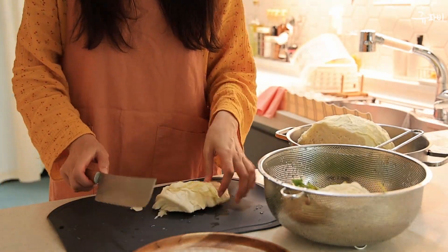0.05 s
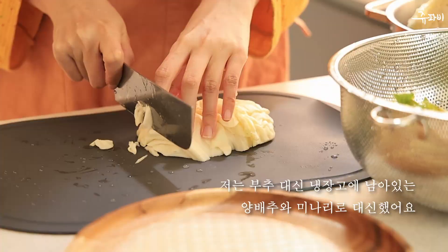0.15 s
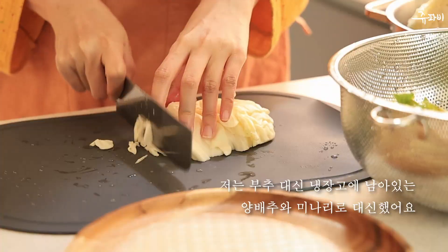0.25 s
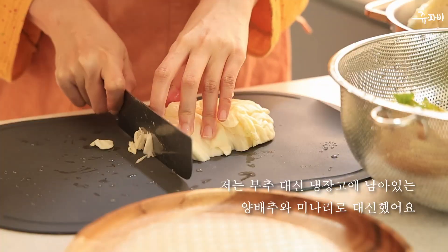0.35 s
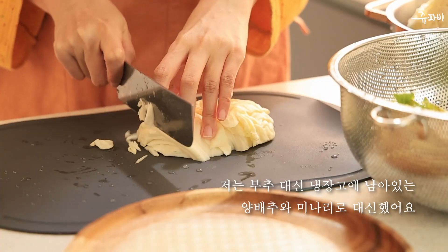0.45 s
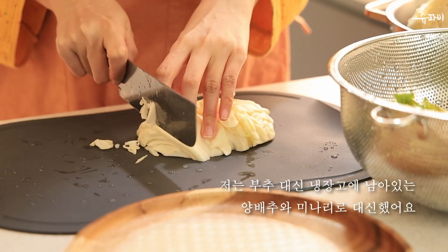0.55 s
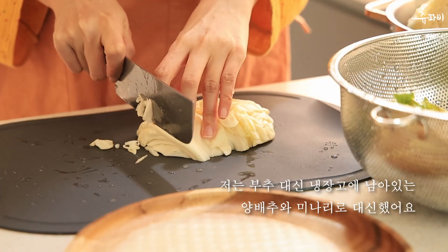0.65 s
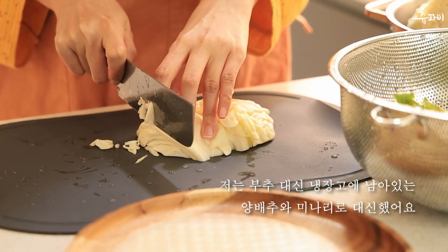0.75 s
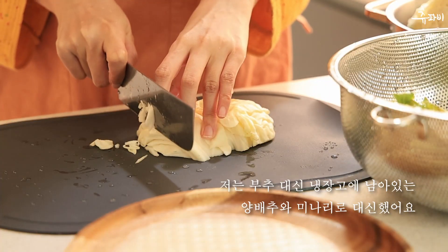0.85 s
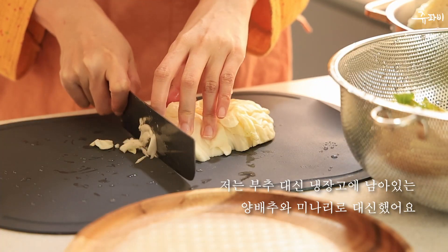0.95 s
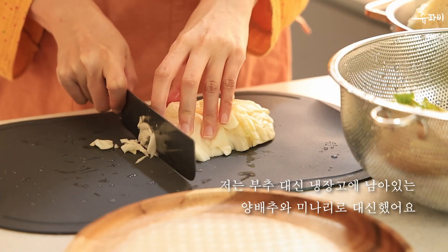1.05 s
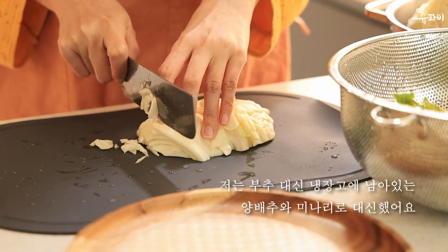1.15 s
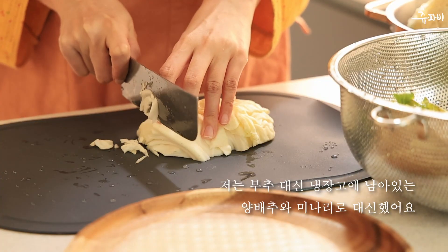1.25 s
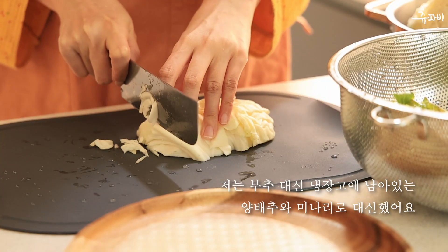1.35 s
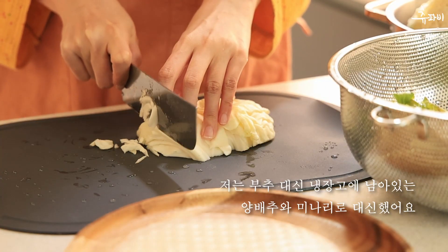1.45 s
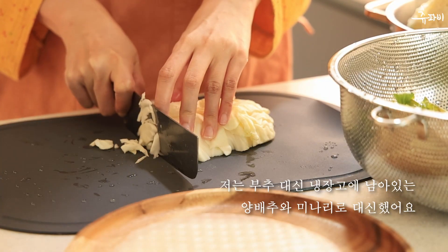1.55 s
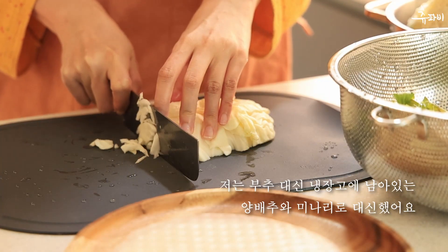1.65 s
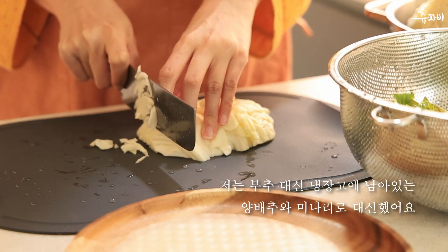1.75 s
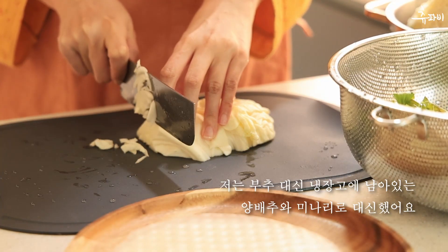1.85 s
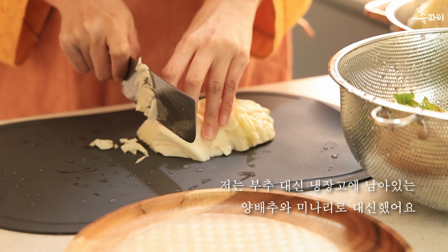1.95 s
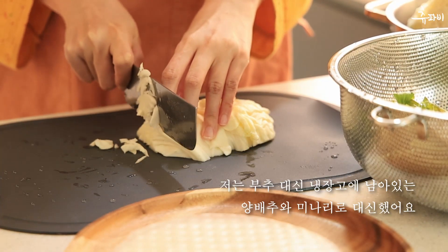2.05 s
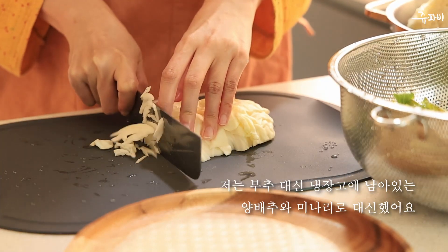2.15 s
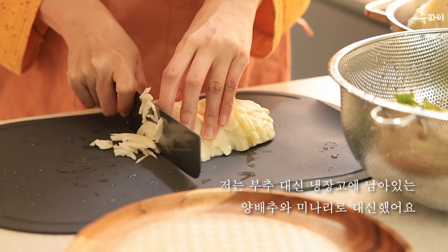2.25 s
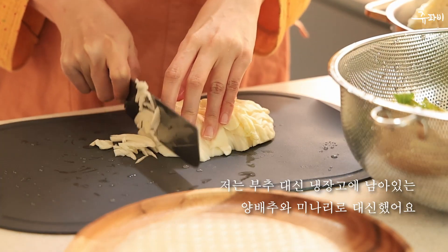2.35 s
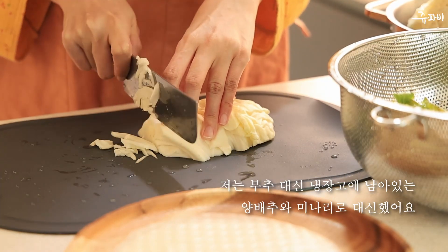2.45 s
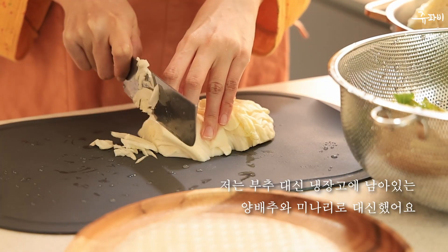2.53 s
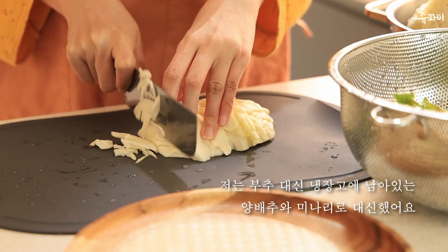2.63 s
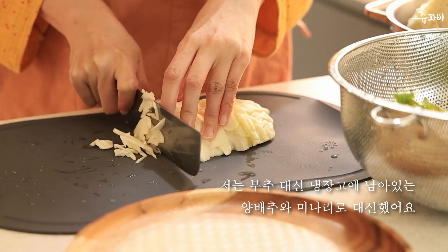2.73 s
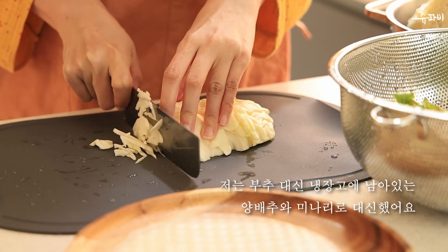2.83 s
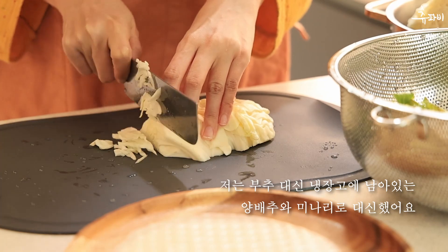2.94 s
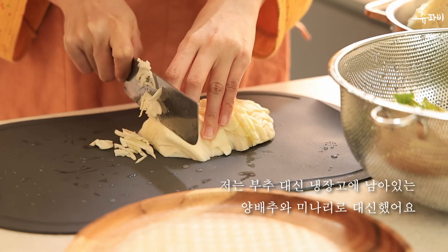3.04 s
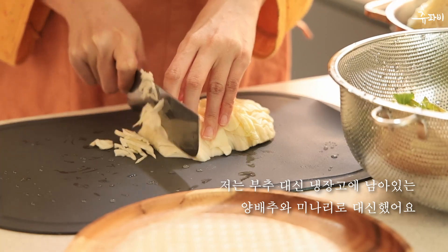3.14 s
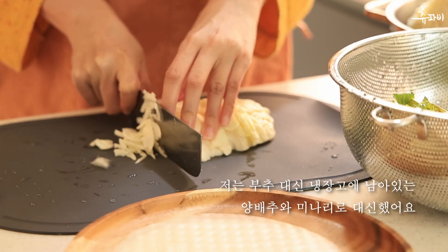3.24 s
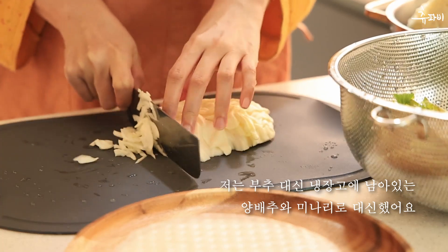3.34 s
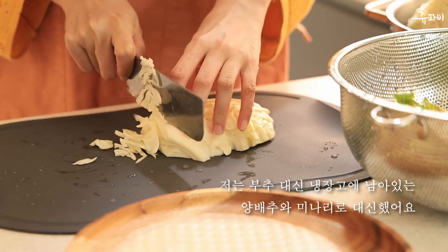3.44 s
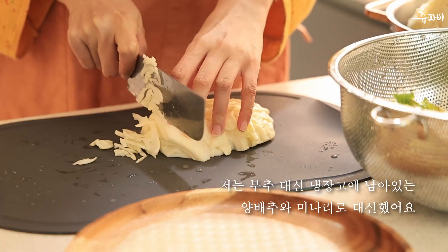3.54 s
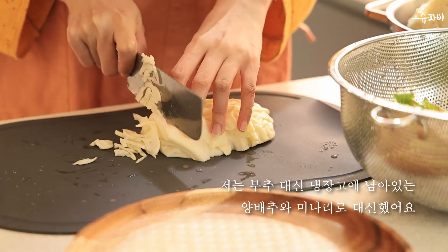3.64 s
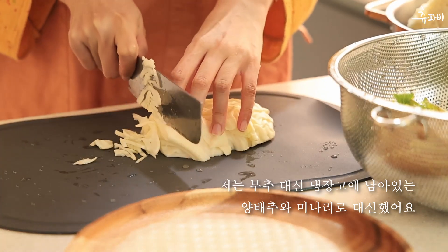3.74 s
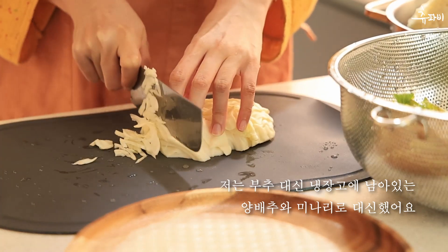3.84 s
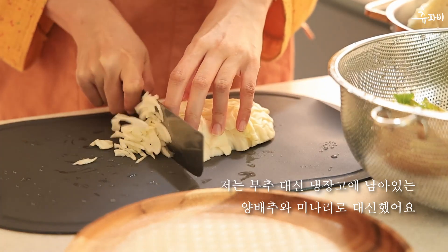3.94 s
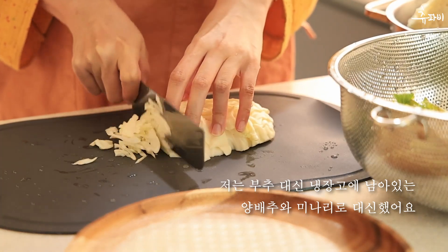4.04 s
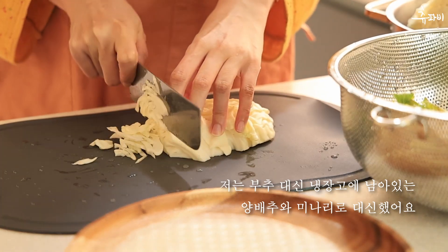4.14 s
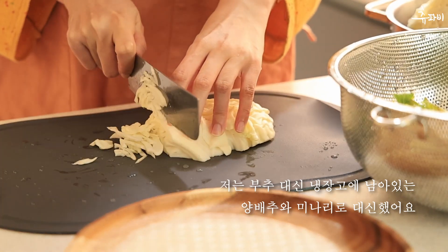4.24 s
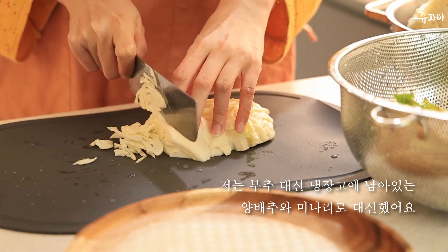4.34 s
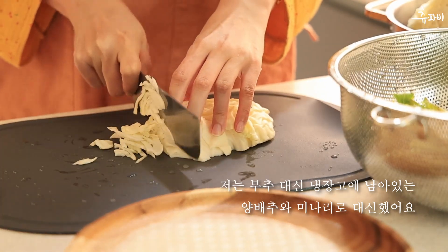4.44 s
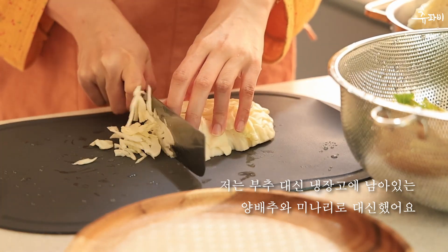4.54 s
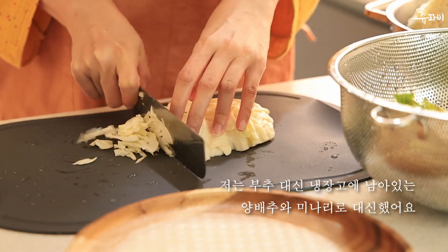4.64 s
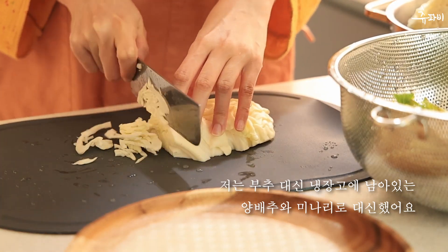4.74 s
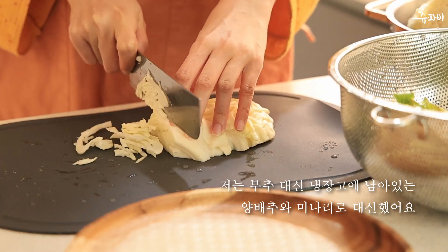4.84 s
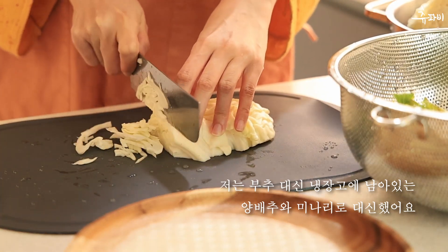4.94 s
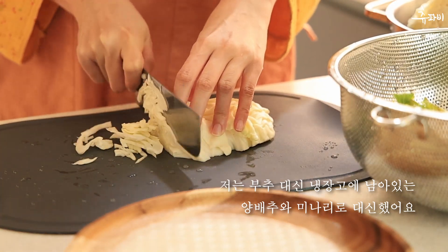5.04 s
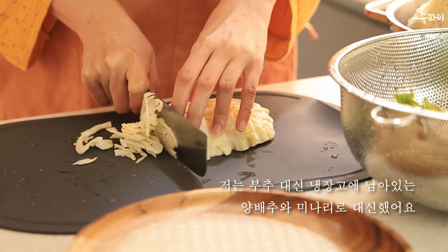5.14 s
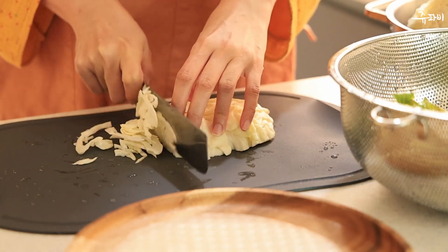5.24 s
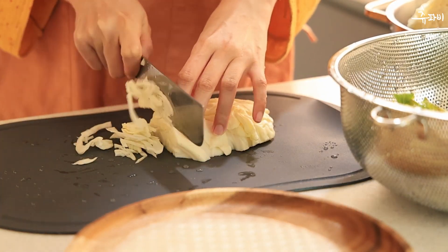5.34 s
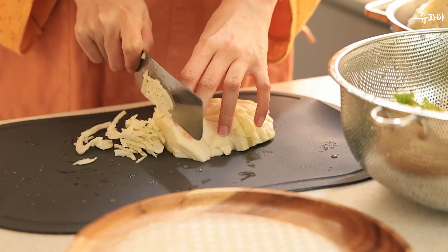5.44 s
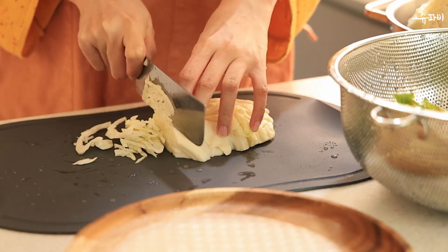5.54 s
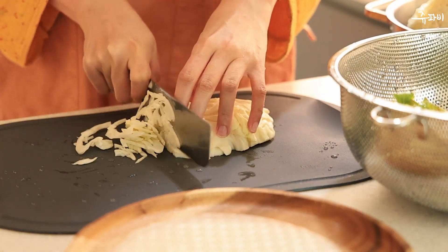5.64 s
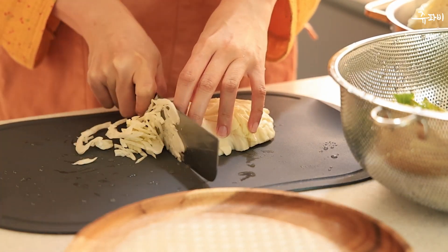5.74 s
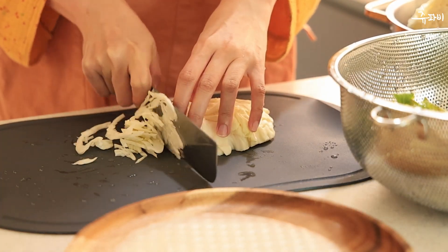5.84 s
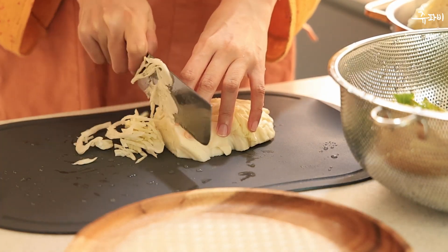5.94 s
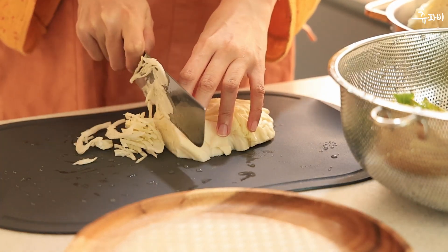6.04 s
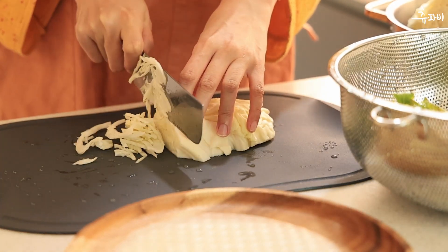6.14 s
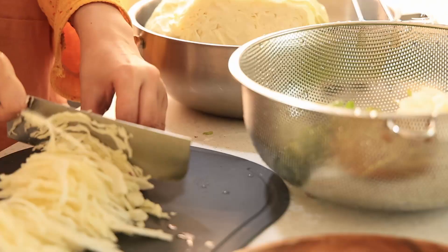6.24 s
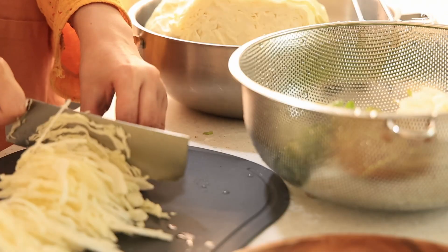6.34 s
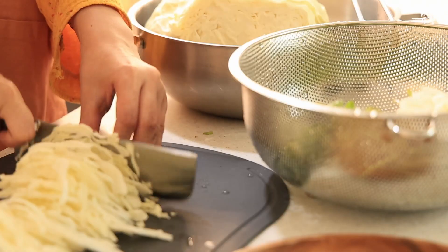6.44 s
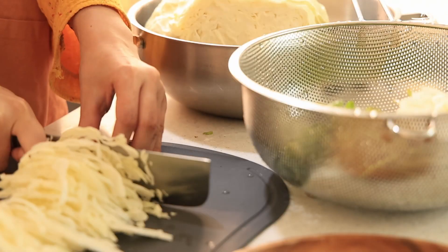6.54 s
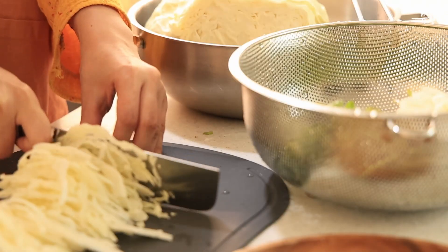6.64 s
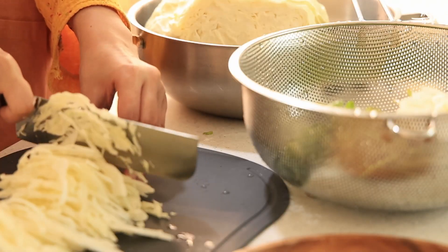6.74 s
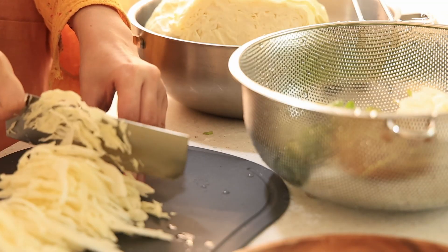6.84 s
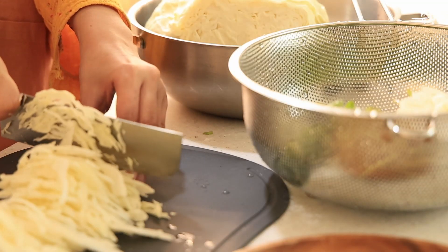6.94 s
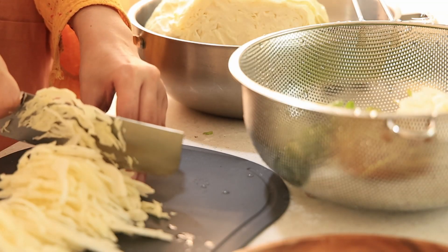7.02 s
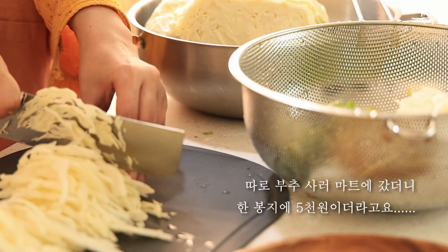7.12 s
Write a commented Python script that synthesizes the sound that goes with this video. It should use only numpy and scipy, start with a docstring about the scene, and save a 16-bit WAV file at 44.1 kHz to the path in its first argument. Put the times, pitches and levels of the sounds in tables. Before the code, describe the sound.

Very close to the microphone, a wide blade slices a cabbage wedge. A bare knock comes first, then ten crunching strokes, each growing louder and juicier before a solid tap on a plastic board. Ribs snap, loose shreds tick and wet leaves rub faintly between strokes. A small kitchen adds short reverberation over quiet air, faint hum and low rumble.

```python
"""Crunching strokes of a broad knife through a wedge of cabbage, each ending in a knock on a plastic board.
Bursting cells give the crunch and fizz, louder and wetter as the blade sinks; struck modes give the knocks.
Ribs snap, shreds tick and leaves rub as filtered noise bursts, over room air, a faint hum and a low rumble.
The knocks ring in a small kitchen and overload the close microphone, where a limiter rounds them off."""
import sys
import numpy as np
from scipy import signal
from scipy.fft import rfft, irfft
from scipy.io import wavfile

SR = 44100
rng = np.random.default_rng(int(sys.argv[2]) if len(sys.argv) > 2 else 0)


def master(y):
    """Save y as 16-bit WAV."""
    cut = np.clip(np.atleast_2d(y).T, -1, 1)
    pcm = np.round(cut * 32767)  # scale
    wavfile.write(sys.argv[1], SR, pcm.astype(np.int16))


N = 316638
TIME = np.arange(N) / SR


def from_db(db):
    """Level law: amplitude gain is ten to the power of decibels over twenty."""
    return 10 ** (np.asarray(db) / 20)


def rms_one(x):
    """Normalisation: equal mean power, so that a later gain alone sets the rms level."""
    return x / np.sqrt(np.mean(x ** 2) + 1e-20)


def at_hz(rows, hz, axis=1):
    """Logarithmic frequency scale: a table column is interpolated by musical interval."""
    rows = np.array(rows)
    return np.interp(np.log(np.maximum(hz, 1)), np.log(rows[:, 0]), rows[:, axis])


def butter(x, hz, kind, order=2):
    """Maximally flat (Butterworth) filtering: the passband has no ripple."""
    return signal.sosfilt(signal.butter(order, hz, kind, fs=SR, output="sos"), x)


def low_pass(x, hz, order=2):
    """Low-pass filtering: slow variations pass and fast ones are smoothed away."""
    return butter(x, hz, "low", order)


def coloured(x, spectrum):
    """Minimum phase: folding the cepstrum gives the causal filter of a given magnitude."""
    size = 2048
    magnitude = from_db(at_hz(spectrum, np.fft.rfftfreq(size, 1 / SR)))
    cepstrum = irfft(np.log(magnitude))
    cepstrum[1:size // 2] *= 2
    cepstrum[size // 2 + 1:] = 0
    impulse_response = irfft(np.exp(rfft(cepstrum)))
    return signal.fftconvolve(x, impulse_response)[:len(x)]


def ring(x, modes, lag=0):
    """Modal superposition: damped resonators in parallel, each `lag` radians behind the one below."""
    out = 0
    for k, (hz, db, t60) in enumerate(modes):
        radius = np.exp(-np.log(1000) / (t60 * SR))
        angle = 2 * np.pi * hz / SR
        start = from_db(db) * np.array([np.sin(-k * lag), radius * np.sin(angle + k * lag)])
        out = out + signal.lfilter(start, [1, -2 * radius * np.cos(angle), radius * radius], x + 1e-18)
    return out


def add(track, s, sound):
    """Linear superposition: a sound is summed into the track from its start time."""
    i = round(s * SR)
    track[i:i + len(sound)] += sound[:N - i]


def grains(per_s, spread_db):
    """Shot noise: independent clicks of uneven size and random sign, as from bursting cells."""
    sizes = from_db(spread_db * np.minimum(rng.exponential(1, N), 4))
    return sizes * rng.choice([-1, 1], N) * (rng.random(N) < per_s / SR)


def flutter(hz, depth_db):
    """Amplitude modulation: a gain of unit rms wavers as slow noise does."""
    return rms_one(from_db(depth_db * rms_one(low_pass(rng.standard_normal(N), hz))))


# blade sinking through the wedge: start_s, sinking_s, easing_s, swell_db (of the crunch while sinking),
# then halfway down, before the common trims: crunch_db, fizz_db, grumble_db
CUTS = [(0.895, 0.11, 0.007, 15.5, -41.5, -48, -46.5), (1.509, 0.07, 0.027, 11.5, -39, -43, -41.5),
        (2.08, 0.097, 0.027, 20.5, -39.5, -47, -37), (2.663, 0.055, 0.016, 22, -38.5, -46.5, -32),
        (3.163, 0.051, 0.04, 16.5, -34, -40.5, -28.5), (3.85, 0.11, 0.0072, 20.5, -34.5, -43.5, -28.5),
        (4.424, 0.1056, 0.0088, 13, -36, -43.5, -28), (5.046, 0.082, 0.035, 8, -34.5, -43, -31.5),
        (5.581, 0.15, .006, 10.5, -37.5, -44.5, -32.5), (6.451, 0.043, 0.072, 7, -31.5, -42, -33)]
# spectrum of breaking leaf: frequency_hz, relative level_db (per Hz)
CRUNCH = [(300, 7), (700, 4.5), (1300, 5), (1700, 6), (2150, 0.5), (2600, 1), (3400, 3), (4200, -1.5),
          (4900, -8), (6100, -4.5), (7200, -10.5), (10000, -19.5)]
# spectrum of escaping juice: frequency_hz, relative level_db (per Hz)
FIZZ = [(3000, -56), (6500, -8.5), (8000, 7), (9100, 8.5), (10500, 3), (13000, -2), (16000, -10)]
# board resonances under the pressing blade: pitch_hz, relative level_db, t60_s
PRESSED = [(112.5, -7, 0.14), (213, -62, 0.048), (339.2, 6, 0.12), (459, 12, 0.065), (482, -3.5, 0.17),
           (723, -2.5, 0.06)]
# juice swells faster than the crunch, the board's grumble more slowly (both as a share of swell_db)
FIZZ_SWELL, GRUMBLE_SWELL = 1.4, 0.55
EASE_DB = 21.5  # fall in level as the last leaves give way, past the thick of the wedge


def cuts(fade_in_s=0.0012, crunch_db=2.0, fizz_db=-1.5, grumble_db=-0.5):
    """Fracture noise: cell bursts strengthen with depth, juice fizzes and jerky force excites the board."""
    gains = np.zeros((3, N))
    for s, sink_s, ease_s, swell_db, *levels in CUTS:
        on = (TIME > s - fade_in_s) & (TIME < s + sink_s + ease_s)
        t = TIME[on] - s
        ease_db = -EASE_DB * (np.maximum(t - sink_s, 0) / ease_s) ** 2
        gate = np.interp(t, [-fade_in_s, 0], [0, 1]) * from_db(ease_db)
        sinking_db = swell_db * (np.minimum(t / sink_s, 1) - 0.5)
        for row, (db, share) in enumerate(zip(levels, (1, FIZZ_SWELL, GRUMBLE_SWELL))):
            gains[row, on] += gate * from_db(db + share * sinking_db)
    crunch_gain, fizz_gain, grumble_gain = gains

    leaves = flutter(hz=144, depth_db=1.4)
    cracks = rms_one(coloured(leaves * grains(per_s=5000, spread_db=1.5), CRUNCH))
    juice = rms_one(coloured(leaves * grains(per_s=9000, spread_db=2.5), FIZZ))
    board = rms_one(ring(grains(per_s=2500, spread_db=0.0), PRESSED))
    crunch = from_db(crunch_db) * crunch_gain * cracks
    fizz = from_db(fizz_db) * fizz_gain * juice
    grumble = from_db(grumble_db) * grumble_gain * board
    return crunch + fizz + grumble


# edge meeting board: start_s, relative force_db, contact hardness_hz (low-pass of the blow),
# spill_db (into worktop and room)
CHOPS = [(0.3326, -1, 1570, -3.5), (1, -7.5, 1160, 1), (1.5880, -4.5, 900, -4.5), (2.1871, -5.5, 565, -8.5),
         (2.7280, -5, 1300, 4), (3.238, -9.5, 880, -2), (3.9538, 6, 2060, -3.5), (4.5308, -6.5, 790, 3.5),
         (5.1367, 0.5, 1370, -5.5), (5.7276, 1.5, 2470, -3.5), (6.206, -23, 460, -3),
         (6.529, -15, 218, -11)]
# damped modes of the board, before each spot's detuning and weighting: pitch_hz, level_db, t60_s
BOARD = [(212, -15, 0.012), (324, -7, 0.033), (430, -5.5, 0.068), (581, -5, 0.034), (677, 0, 0.0095),
         (838, -10, 0.039), (1074, 1, 0.0071), (1213, -6, 0.0063), (1544, -2, 0.0098), (2660, -3, 0.0037),
         (3300, -0.5, 0.0065), (6460, -7, 0.0046), (8850, 4.5, 0.0021)]
# longer-ringing modes of the worktop under it: pitch_hz, level_db, t60_s
WORKTOP = [(103, -56, 0.11), (266, -34, 0.46), (333, -45, 0.098), (426.3, -32, 0.65), (523, -52, 0.069),
           (532, -25.5, 0.23)]
HEEL_LAG_S, HEEL_DB = 0.00574, -9.5  # the heel lands just after the edge, and softer


def chops(spot_db=2.5, travel_lag=2.067, heel_hz=600, radiate_hz=170, spill_hz=1800):
    """Impact excitation: edge and heel strike the modes; gives close knocks and a duller spill to the room."""
    close, spill = np.zeros(N), np.zeros(N)
    tap = signal.unit_impulse(SR // 2) + 1e-18
    heel = from_db(HEEL_DB) * np.roll(low_pass(tap, heel_hz), round(HEEL_LAG_S * SR))
    spots = rng.standard_normal((len(CHOPS), len(BOARD), 2))
    for (s, db, hard_hz, spill_db), spot in zip(CHOPS, spots):
        # a harder contact reaches higher modes
        push = from_db(db) * (low_pass(tap, hard_hz) + heel)
        # every spot on the board detunes and weights the modes anew
        detune = 1 + 0.025 * spot[:, 0]
        weight_db = spot_db * spot[:, 1]
        modes = [(hz * a, level + b, t60) for (hz, level, t60), a, b in zip(BOARD, detune, weight_db)]
        knock = ring(push, modes, travel_lag)  # staggered phases, as bending waves spread the blow
        knock = butter(knock, radiate_hz, "high")  # a small board radiates little bass
        worktop = ring(push, WORKTOP)
        add(close, s, knock + from_db(spill_db) * worktop)
        add(spill, s, from_db(spill_db) * knock)
    return close, low_pass(spill, spill_hz)


# snapping ribs and ticking wet shreds: start_s, peak level_db, pitch_hz (band centre), crumbling_s
SNAPS = [(0.0707, -31, 3150, 0.03), (0.2846, -26, 2420, 0.0032), (0.961, -16, 2270, 0.012),
         (0.992, -9, 2980, 0.0048), (1.1938, -33.5, 8160, 0.0052), (1.511, -46, 4000, .008),
         (1.554, -18, 2240, 0.0093), (2.47, -32, 7750, 0.0061), (2.715, -15, 11100, 0.0044),
         (2.998, -35.5, 4470, 0.0053), (3.061, -38, 3150, 0.0058), (3.5927, -39, 6950, 0.012),
         (3.8506, -28.5, 1780, 0.0056), (4.2935, -34.5, 6340, 0.0039), (4.5293, -15, 9700, 0.0017),
         (4.648, -40, 7000, 0.0036), (5.5817, -30.5, 3120, 0.0026), (6.207, -37.5, 1740, 0.026),
         (6.422, -37, 6040, 0.0027), (6.4489, -22.5, 2470, 0.0013)]


def snaps(die_s=0.00052, crumble_db=-10, width=1.33):
    """Brittle fracture: one crack of band noise decays at once, then a weaker crumbling decays slowly."""
    out, t = np.zeros(N), TIME[:SR // 10]
    rows = list(SNAPS) + settling()
    for (s, db, hz, crumble_s), noise in zip(rows, rng.standard_normal((len(rows), len(t)))):
        envelope = np.exp(-t / die_s) + from_db(crumble_db) * np.exp(-t / crumble_s)
        burst = butter(noise * envelope, [hz / width, hz * width], "band")
        add(out, s, from_db(db) * burst / np.abs(burst).max())
    return out


# loose shreds tick roughly between these times; level and pitch are the middle of their spread
SETTLE_FROM_S, SETTLE_TO_S = 1.3, 5.5
TICK_DB, TICK_HZ, TICK_CRUMBLE_S = -41, 4870, 0.0059


def settling(count=10, spread_db=3.0, spread_octaves=1.0):
    """Random relaxation: loose shreds tick at jittered moments, given as rows like those of SNAPS."""
    slot_s = (SETTLE_TO_S - SETTLE_FROM_S) / count
    rows = []
    for k, (when, size, pitch) in enumerate(rng.uniform(-0.88, 1, (count, 3))):
        start_s = SETTLE_FROM_S + slot_s * (k + when / 2)
        tick_hz = TICK_HZ * 2 ** (spread_octaves * pitch)
        rows.append((start_s, TICK_DB + spread_db * size, tick_hz, TICK_CRUMBLE_S))
    return rows


# blade and fingers sliding on leaves: start_s, length_s, level_db
RUBS = [(0.016, 0.15, -45.5), (0.282, 0.032, -41.5), (0.498, 0.042, -44.5), (1.737, 0.036, -49),
        (2.915, 0.11, -54.5), (3.353, 0.25, -60), (5.38, 0.13, -54), (6.068, 0.037, -52.5),
        (6.195, 0.037, -50)]
# spectrum of the sliding: frequency_hz, relative level_db (per Hz)
RUB = [(710, -13), (1200, 2), (1970, -2.5), (2710, 1), (4790, -6.5), (5550, -8), (9130, -10.5),
       (10800, -9.5), (12000, -19), (15000, -20)]
LIFT_AFTER_S, LIFT_S, LIFT_DB = 0.086, 0.2, -61  # after each cut the rising blade brushes the cut face


def rubs(rise=0.27, end_share=0.5):
    """Friction noise: many tiny slips of wet leaf under blade and fingers merge into a faint hiss."""
    lifts = [(s + sink_s + LIFT_AFTER_S, LIFT_S, LIFT_DB) for s, sink_s, *_ in CUTS]
    touch = np.zeros(N)
    for s, length, db in list(RUBS) + lifts:
        progress = (TIME - s) / length
        touch += from_db(db) * np.interp(progress, [0, rise, 1, 1.15], [0, 1, end_share, 0])
    return touch * rms_one(coloured(grains(per_s=5200, spread_db=6.5), RUB))


# modes of a short dry click: pitch_hz, level_db, t60_s
CLICK = [(398, -10.5, 0.0074), (1140, -15.5, 0.0079), (2900, -19, 0.0044), (9000, -37, .003)]


def click():
    """Impulse response: one impulse sets off a few strongly damped modes of alternating sign."""
    out = np.zeros(N)
    add(out, 0.1637, ring(signal.unit_impulse(SR // 20), CLICK, lag=np.pi))
    return out


# reverberation of the kitchen: frequency_hz, level_db, t60_s
KITCHEN = [(100, -1.5, 0.37), (243, 0.5, 0.22), (440, -4.5, 0.31), (890, -7.5, 0.32), (1530, -9, 0.3),
           (2800, -12.5, 0.2), (7700, -13, 0.29), (14000, -45, 0.084)]


def kitchen(x, first_echo_s=0.003, build_s=0.014):
    """Diffuse reverberation: dense echoes build up after the first wall and decay band by band."""
    t, edges = TIME[:SR // 2], np.geomspace(60, 16000, 41)
    response, white = 0, rng.standard_normal((len(edges), len(t)))
    swell = 1 - np.exp(-np.maximum(t - first_echo_s, 0) / build_s)
    for low, high, noise in zip(edges, edges[1:], white):
        hz = np.sqrt(low * high)
        decay = np.exp(-np.log(1000) * t / at_hz(KITCHEN, hz, axis=2))
        tail = butter(noise, [low, high], "band") * swell * decay
        # energy in proportion to bandwidth
        share = np.sqrt(2 * (high - low) / SR / np.sum(tail ** 2))
        response = response + from_db(at_hz(KITCHEN, hz)) * tail * share
    return signal.fftconvolve(x, response)[:N]


# spectrum of the room air: frequency_hz, relative level_db (per Hz)
AIR = [(12, -34), (20, -14), (34, -12), (54, -13.5), (72, -0.5), (87, -14.5), (148, -9), (232, -11.5),
       (274, -5.5), (352, -11), (452, -11.5), (631, -15), (857, -13), (3260, -29.5), (15500, -37)]
AIR_DB = -48.5
# a low rumble swells and fades while the hands work
RUMBLE_DB, RUMBLE_PEAK_S, RUMBLE_RISE_DB_PER_S, RUMBLE_FALL_DB_PER_S = -48, 5.44, 0.8, 4


def background(hum_hz=275, hum_db=-58, hum_t60=0.092, rumble_hz=60, rumble_t60=0.13):
    """Stationary and resonant noise: shaped air, a faint hum, and a rumble that swells and fades."""
    air = from_db(AIR_DB) * rms_one(coloured(rng.standard_normal(N), AIR))
    hum = from_db(hum_db) * rms_one(ring(rng.standard_normal(N), [(hum_hz, 0, hum_t60)]))
    rumble = rms_one(ring(rng.standard_normal(N), [(rumble_hz, 0, rumble_t60)]))
    t = TIME - RUMBLE_PEAK_S
    slope_db = np.minimum(RUMBLE_RISE_DB_PER_S * t, -RUMBLE_FALL_DB_PER_S * t)
    return air + hum + rumble * from_db(RUMBLE_DB + slope_db)


def scene():
    """Direct and reverberant field: knife work close by, the kitchen around it."""
    knocks, spill = chops()
    cabbage = cuts() + snaps() + rubs()
    return (knocks + cabbage + kitchen(spill + cabbage) + click() + background())[None]


CUTOFF_HZ = 15650


def record(dry, threshold_db=0.0, release_db_per_s=110, attack_hz=70):
    """Peak limiting: gain ducks after hard knocks, whose first swing gets through and is rounded off."""
    over = np.maximum(20 * np.log10(np.abs(dry[0]) + 1e-9) - threshold_db, 0)
    # hold each overshoot, then release it at a steady rate
    release = release_db_per_s * TIME
    held = np.maximum.accumulate(over + release) - release
    ducked = dry * from_db(-low_pass(held, attack_hz, order=1))
    limited = ducked / (1 + ducked ** 6) ** (1 / 6)
    steep_low_pass = signal.ellip(10, 0.1, 70, CUTOFF_HZ, fs=SR, output="sos")
    return signal.sosfilt(steep_low_pass, limited)


dry = scene()
out = record(dry)
master(out)
```